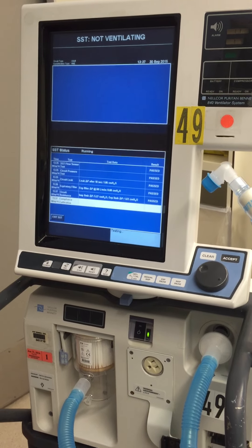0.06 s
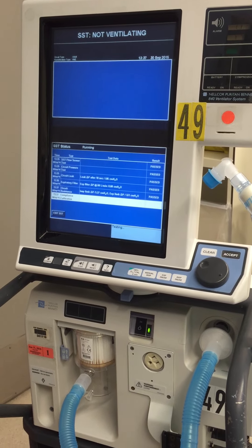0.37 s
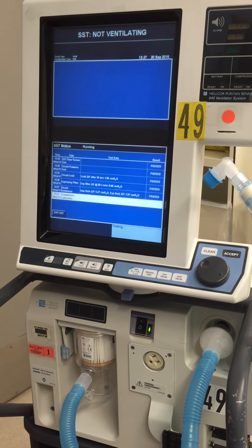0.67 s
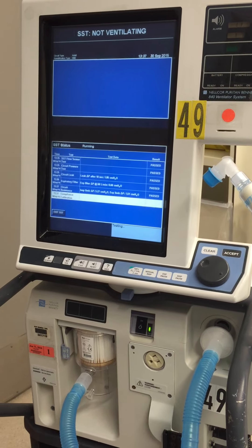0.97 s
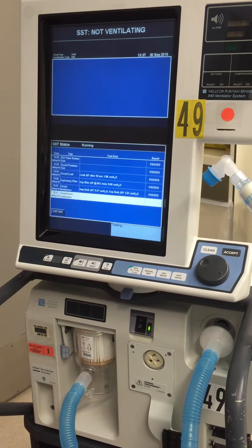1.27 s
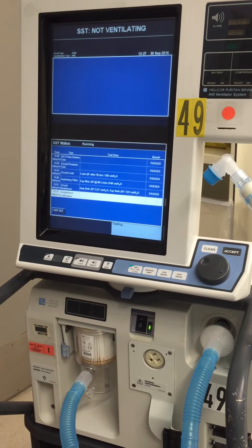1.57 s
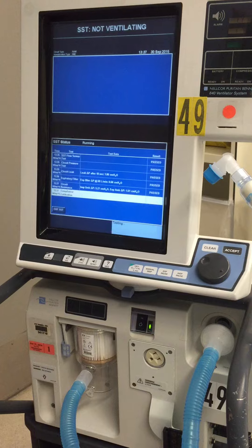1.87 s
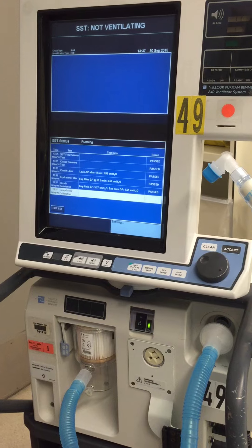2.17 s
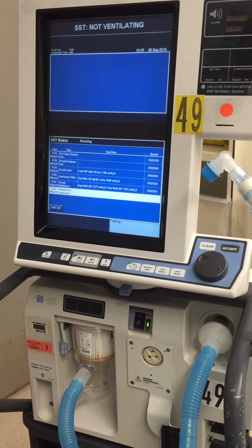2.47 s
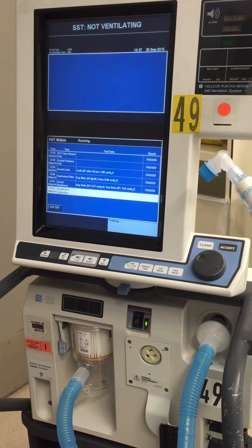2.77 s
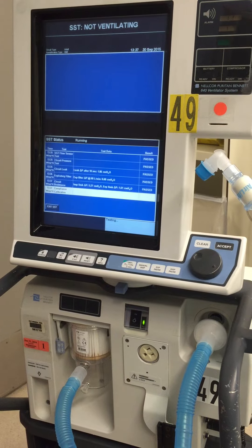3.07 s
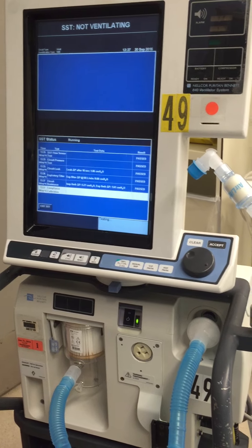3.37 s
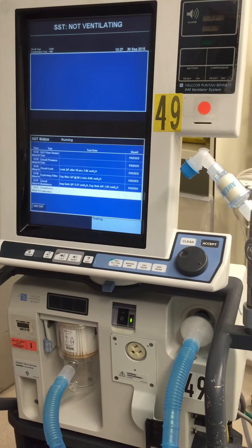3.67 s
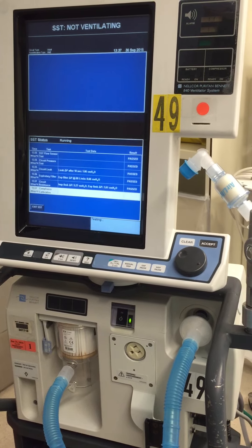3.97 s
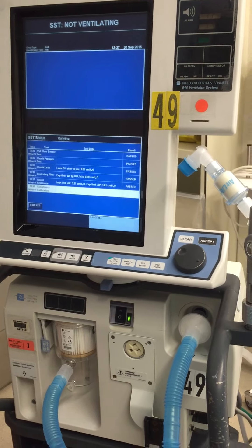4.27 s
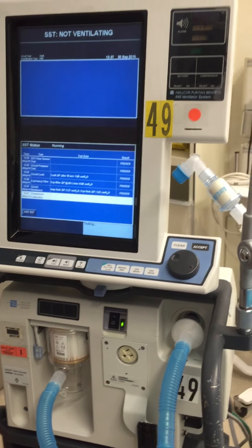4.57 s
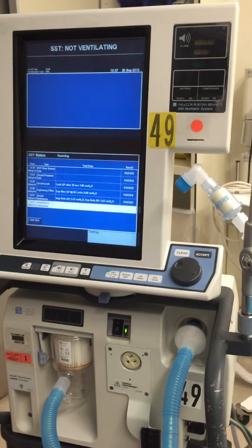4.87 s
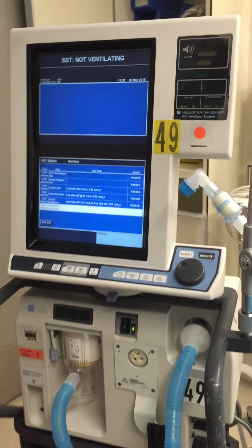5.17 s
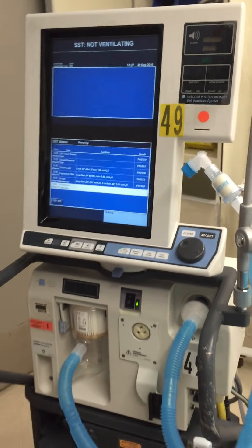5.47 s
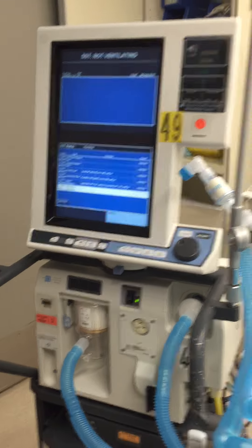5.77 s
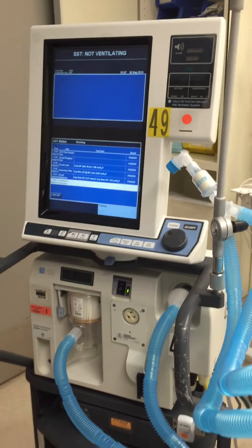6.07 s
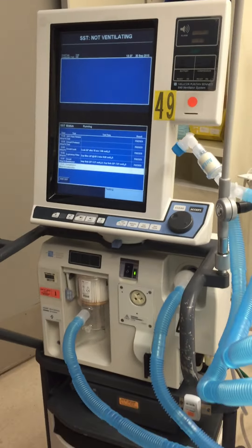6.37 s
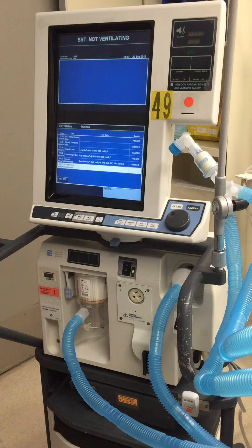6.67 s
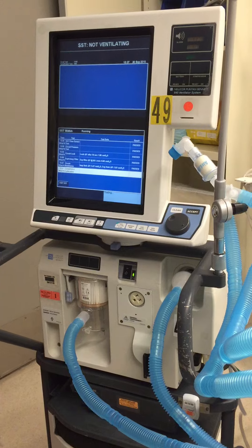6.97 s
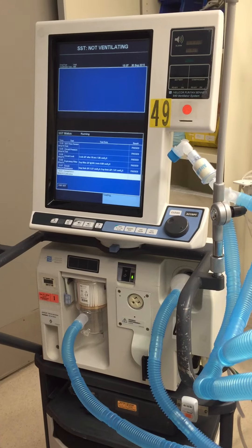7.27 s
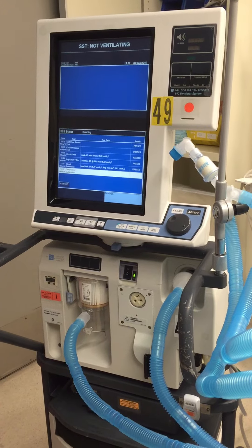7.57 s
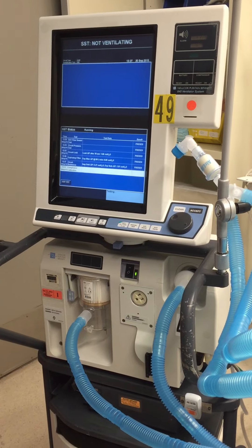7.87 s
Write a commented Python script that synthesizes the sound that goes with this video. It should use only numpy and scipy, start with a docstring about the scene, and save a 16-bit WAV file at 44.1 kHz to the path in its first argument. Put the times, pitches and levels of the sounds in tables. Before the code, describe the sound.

A ventilator runs in a small hospital room, its air compressor giving a steady low hum with a soft, rapid purr. Cooling air rumbles beneath it, panels and light metal parts buzz faintly, and gas hisses thinly in the tubing. About halfway through, the close, hand-held microphone moves round to one side, so the tone shifts slightly and the higher buzz eases while the hum carries on.

```python
"""A small hospital room, with a phone microphone held in front of a running ventilator. From about
4 s to 7 s it is carried round to one side, and the tones and wall echoes shift with it.
Behind, compressed gas hisses thinly in valves and tubing and cooling air rumbles through the cabinet.
Over that, the air compressor hums on the orders of one shaft, knocks softly on every turn
and sets panel edges and light metal parts buzzing."""
import sys
import numpy as np
from scipy import signal
from scipy.fft import rfft, irfft
from scipy.io import wavfile

SR = 44100
rng = np.random.default_rng(int(sys.argv[2]) if len(sys.argv) > 2 else 0)


def dump_mix(stems):
    """Bounce the given channels to the path in sys.argv[1] as a 16-bit WAV at rate SR."""
    frames = np.atleast_2d(stems).T  # one column per channel
    limited = np.clip(frames, -1, 1)  # hard clip at full scale
    pcm = np.round(limited * 32767).astype(np.int16)
    wavfile.write(sys.argv[1], SR, pcm)


N = 349272
T = np.arange(N) / SR
FREQS = np.maximum(np.fft.rfftfreq(N, 1 / SR), 1)
SHAFT_HZ, SOUND_M_S = 28.8594, 343

# microphone path: t/s, aside (0 in front .. 1 at the side)
MIC_PATH = [(0, 0), (4.0, 0.031), (4.9, 0.17), (5.55, 0.53), (6.4, 0.94), (7.0, 1), (7.9, 0.97)]
# spectra of the gas jet and the cooling air: f/Hz, relative level/dB
JET_SPECTRUM = [(1500, 0.5), (3300, 8), (4500, 7), (6200, 6.5), (6700, 6), (9000, 11), (9900, 4.5),
                (10400, 4.5), (12400, 5), (13000, 3), (14200, -0.5), (15500, -5)]
AIR_SPECTRUM = [(20, -24), (45, -17.5), (75, -16), (96, -1.5), (140, -7), (225, -7.5), (268, -12.5),
                (305, -11), (450, -14.5), (560, -21.5), (1060, -26.5), (1500, -34), (2200, -37.5),
                (5000, -52.5), (12000, -74)]
# gas passage resonances: f/Hz, width/Hz, relative level/dB in front, halfway, at the side
GAS_PASSAGES = [(6685, 240, -2.5, -7, -1.5), (7100, 280, -2, -2, -2), (7530, 113, 0.5, -8, -3),
                (7950, 300, -7, -10, -11), (8530, 130, -3.5, -4, 1.5), (9080, 180, -14, -5, -11),
                (11030, 170, -6.5, -11, -15), (11780, 220, -6, -8, -12), (12040, 120, -6, -8, -11),
                (12380, 240, -9, -8, -20)]
# course of the valve's sizzle: t/s, level/dB
SIZZLE_LEVEL = [(0, -70.5), (1.5, -71), (3.1, -71.5), (3.6, -73.5), (4.3, -70.5), (5.05, -69), (5.5, -76),
                (5.9, -73), (7.9, -72.5)]
# faint swells of hiss: t/s, half-length/s, f/Hz, width/Hz, level/dB
HISS_SWELLS = [(0.165, 0.082, 5800, 400, -76), (0.868, 0.053, 3360, 90, -71.5),
               (1.2, 0.099, 2100, 1100, -65), (1.95, .03, 2850, 220, -64), (4.038, 0.043, 6830, 400, -64.5),
               (6.297, 0.17, 5200, 2000, -74), (7.565, 0.031, 2750, 300, -71)]
# resonances of the machine's parts: f/Hz, width/Hz, relative level/dB
VALVE_MODES = [(9410, 130, -1.5), (9670, 210, 2)]
CABINET_MODES = [(185, 19, -4), (325, 53, -17), (438, 13, -16.5)]
PANEL_MODES = [(596, 13, 6), (682, 10, 4), (791, 21, 5.5), (918, 46, 3), (973, 50, 3), (1038, 40, 1.5),
               (1157, 14, 2), (1192, 14, 0), (1287, 28, -2), (1337, 16, -4), (1430, 27, -3)]
EDGE_MODES = [(983, 47, 2), (1170, 190, -5), (1510, 330, -14)]
COVER_MODES = [(1763, 60, 0), (1853, 60, -2.5), (1661, 55, -3.5)]
LOW_METAL_MODES = [(2298, 30, -0.5), (2336, 20, -3.5), (2373, 28, 2)]
HIGH_METAL_MODES = [(2714, 26, 4.6), (2770, 22, 5), (2750, 300, 1.2), (2885, 31, 5), (2942, 34, 10.6),
                    (3064, 45, 6.5)]
# course of the lower buzz and of the higher, which radiates to the front: t/s, gain/dB
LOW_BUZZ_GAIN = [(0, -6), (0.7, -3), (2.5, -2), (4.1, -3.5), (4.5, 3), (4.8, -0.5), (5.5, 0), (5.9, -10),
                 (6.6, -10), (6.9, -3.5), (7.8, -8)]
HIGH_BUZZ_GAIN = [(0, -1.5), (1.1, 0), (2.3, 0), (2.9, -1), (3.55, 1.5), (4.1, -2.5), (4.9, -2.5),
                  (5.7, -3.5), (7.9, -7)]
# compressor tones: shaft order (rounded in use), level/dB in front, halfway, at the side
HUM_ORDERS = [(2, -49.5, -51, -50.5), (3, -65, -61, -69), (4, -31.7, -31, -30.5), (5, -63, -58, -59),
              (6, -62.5, -55.5, -50.5), (7, -53, -53, -57), (8, -58.5, -60.5, -61.5),
              (9, -54.5, -58.5, -61.5), (10, -61, -62, -69), (11, -53, -50.5, -52.5), (12, -62.5, -65, -73),
              (13, -49, -46, -48.5), (14, -59, -54, -61), (15, -53, -53, -50.5), (16, -69, -75, -67),
              (17, -50.5, -52, -55), (18, -60.5, -59, -63.5), (19, -73, -80, -64.5), (20, -64.5, -75, -69),
              (21, -73.5, -81, -81), (22, -71.5, -71.5, -79), (23, -63, -61.5, -67.5), (24, -80, -76, -80),
              (25, -68.5, -72, -76), (27, -78, -74, -74.5), (28, -82, -77, -79), (29, -69.5, -73, -74),
              (31, -71, -69, -71), (32, -77, -77, -85), (33, -64.5, -64.5, -62), (35, -93, -73, -74),
              (40, -81, -87, -77), (43, -80, -86, -80), (68.2, -90, -94, -78)]


def undb(db):
    """Decibels to gain."""
    return 10 ** (np.asarray(db) / 20)


def level(x, db):
    """Scale a sound to an rms level."""
    return x * undb(db) / np.sqrt(np.mean(x ** 2))


def noise():
    """White noise."""
    return rng.standard_normal(N)


def shape(x, response):
    """Filter a sound by a frequency response."""
    return irfft(rfft(x) * response, N)


def walk(rate_hz):
    """Smooth random drift of spread 1, changing about rate_hz times a second."""
    return level(shape(noise(), np.exp(-(FREQS / rate_hz) ** 2)), 0)


def colour(points):
    """Response through (f/Hz, level/dB) points on a log-frequency axis."""
    hz, db = np.transpose(points)
    return undb(np.interp(np.log(FREQS), np.log(hz), db))


def resonances(modes):
    """Response of (f/Hz, width/Hz, level/dB) resonances with steep skirts, added in power."""
    power = sum(undb(db) ** 2 / (1 + 2 * ((FREQS - hz) / width) ** 2) ** 2 for hz, width, db in modes)
    return np.sqrt(power)


def resonant_noise(modes, db):
    """Noise through resonances, at an rms level."""
    return level(shape(noise(), resonances(modes)), db)


def course(points):
    """Follow (t/s, value) points through the scene."""
    return np.interp(T, *np.transpose(points))


def at_mic(aside, levels):
    """Level at the microphone, between those in front, halfway and at the side."""
    return np.interp(aside, [0, .5, 1], levels)


def room(x, aside, wet_db, count=24, first_s=.004, last_s=.03, step_m=0.3455, tremble_m=.004):
    """Wall echoes comb the sound; their paths slide as the hand trembles and the microphone moves."""
    moved_s = (step_m * aside + tremble_m * walk(1.4)) / SOUND_M_S
    oversampled = signal.resample_poly(x, 2, 1)
    fine_t = np.arange(len(oversampled)) / (2 * SR)
    echoes = 0
    for lag, (offset, direction) in zip(np.linspace(first_s, last_s, count), rng.random((count, 2))):
        delay = lag + offset * first_s + moved_s * np.cos(np.pi * direction)
        echoes = echoes + np.interp(T - delay, fine_t, oversampled)
    return (x + level(echoes, wet_db) * np.std(x)) / np.sqrt(1 + undb(wet_db) ** 2)


def swells():
    """Brief soft rises of hiss, far in the background."""
    return sum(resonant_noise([(hz, width, 0)], db) * np.exp(-((T - peak_s) / half_s) ** 2)
               for peak_s, half_s, hz, width, db in HISS_SWELLS)


def gas(aside, aside_db=-1.0, flicker_db=1.5, flutter_db=0.5):
    """A steady jet hisses, each passage flickers on its own, and a valve sizzles."""
    hiss = level(shape(noise(), colour(JET_SPECTRUM)), -67.5) * undb(aside_db * aside)
    mean_width = np.mean([row[1] for row in GAS_PASSAGES])
    for hz, width, *levels in GAS_PASSAGES:
        band = resonant_noise([(hz, width, 0)], -73) * np.sqrt(width / mean_width)
        hiss = hiss + band * undb(at_mic(aside, levels) + flicker_db * walk(29))
    sizzle = resonant_noise(VALVE_MODES, 0) * undb(course(SIZZLE_LEVEL) + 1.1 * walk(14))
    return (hiss + sizzle) * undb(flutter_db * walk(27))


def cooling_air(aside, aside_db=1.25, swell_db=1.03, throb_db=2.0):
    """Turbulence rumbles through the vents and throbs in the cabinet, a little louder at the side."""
    rumble = level(shape(noise(), colour(AIR_SPECTRUM)), -48.2) * undb(swell_db * walk(26))
    boom = resonant_noise(CABINET_MODES, -52) * undb(throb_db * walk(10))
    return (rumble + boom) * undb(aside_db * aside)


def housing(aside, aside_db=-3.0, flicker_db=2, side_panel_rise_db=5):
    """Panels ring in the air stream and flicker; one steady panel is picked up best from the side."""
    panels = sum(shape(noise(), resonances([mode])) * undb(flicker_db * walk(11)) for mode in PANEL_MODES)
    side_panel = resonant_noise([(952, 28, 0)], -71) * undb(side_panel_rise_db * aside)
    return level(panels, -60) * undb(aside_db * aside) + side_panel


def whine(turns, aside, order=100, front_db=-77.5, aside_db=-17, waver_db=2.5):
    """A thin tone on a high order of the shaft, beamed to the front."""
    db = front_db + aside_db * aside + waver_db * walk(6.5)
    return np.sqrt(2) * np.sin(2 * np.pi * order * turns) * undb(db)


def strokes(turns, depth):
    """Gain that pulses with the two piston strokes of each turn."""
    return 1 + depth * np.cos(2 * np.pi * 2 * turns)


def rattle(turns, scatter_db=4.5):
    """Loose panel edges chatter in uneven grains, driven by both strokes."""
    grains = noise() * undb(scatter_db * walk(70)) * strokes(turns, depth=0.62)
    return level(shape(grains, resonances(EDGE_MODES)), -67)


def once_a_turn(turns):
    """A unit impulse as the shaft completes each turn."""
    return np.diff(np.floor(turns), prepend=0)


def buzz(turns, modes, ring_db, rasp_db, scatter_db=3.0, t60_s=0.21, flicker_db=1.0):
    """Metal parts are tapped once a turn, unevenly, and rasp with both strokes."""
    metal = resonances(modes)
    taps = once_a_turn(turns) * undb(scatter_db * noise())
    decay = noise() * np.exp(-np.log(1000) * T / t60_s)
    ring = shape(taps, rfft(decay) * metal)
    rasp = shape(noise() * strokes(turns, depth=0.068), metal)
    return (level(ring, ring_db) + level(rasp, rasp_db)) * undb(flicker_db * walk(26))


def metal_parts(turns, aside, cover_aside_db=-4):
    """The compressor shakes a thin cover and two groups of light metal parts."""
    cover = buzz(turns, COVER_MODES, ring_db=-73, rasp_db=-73.5) * undb(cover_aside_db * aside)
    low = buzz(turns, LOW_METAL_MODES, ring_db=-76, rasp_db=-71.5) * undb(course(LOW_BUZZ_GAIN))
    high = buzz(turns, HIGH_METAL_MODES, ring_db=-73, rasp_db=-71) * undb(course(HIGH_BUZZ_GAIN))
    return cover + low + high


def knock(turns, aside, thud_hz=400, puff_hz=700, puff_decay_s=0.0052, puff_aside_db=-7):
    """The piston knocks softly and unevenly on every turn, with a short puff from its valve."""
    taps = once_a_turn(turns) * noise()
    thud = level(shape(taps, resonances([(thud_hz, 140, 0)])), -60)
    since_tap_s = (turns % 1) / SHAFT_HZ
    burst = noise() * np.exp(-since_tap_s / puff_decay_s)
    puff = level(shape(burst, resonances([(puff_hz, 130, 0)])), -65.5)
    return thud + puff * undb(puff_aside_db * aside)


def compressor(turns, aside, held_cycles=16, echo_cycles=0.31):
    """Piston strokes hum; the cabinet holds low orders back longest, so each falls in pitch and purrs."""
    hum = 0
    for order, *levels in HUM_ORDERS:
        order = round(order)
        waver_db = 0.24 if order == 4 else 0.5  # the strong fourth order is the steadiest
        db = at_mic(aside, levels) + waver_db * walk(7.8)  # standing waves: each spot has its own level
        scatter = (rng.random() - .5) * echo_cycles * aside  # echoes shift the phase at the side
        lag = held_cycles * np.log(order) + scatter
        hum = hum + undb(db) * np.sqrt(2) * np.cos(2 * np.pi * (order * turns - lag))
    return hum


def scene():
    """At the moving microphone: gas and air flow steadily while one shaft drives the hum and buzz."""
    aside = course(MIC_PATH)
    turns = SHAFT_HZ * T + 0.00073 * walk(3)  # the load barely sways the motor
    metal = room(metal_parts(turns, aside), aside, wet_db=-9.5) + whine(turns, aside)
    hiss = room(gas(aside), aside, wet_db=-0.5) + swells()
    pump = compressor(turns, aside) + knock(turns, aside) + rattle(turns)
    airflow = housing(aside) + cooling_air(aside)
    return (hiss + airflow + metal + pump)[None]


def record(dry):
    """The hand-held phone, in mono, cuts the top steeply above 15.7 kHz."""
    return signal.sosfilt(signal.ellip(10, .1, 80, 15700, fs=SR, output="sos"), dry)


dry = scene()
out = record(dry)
dump_mix(out)
```